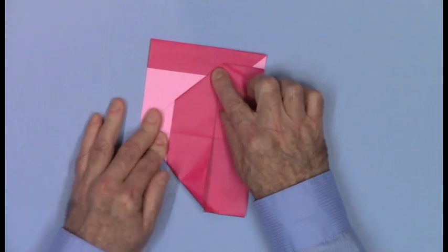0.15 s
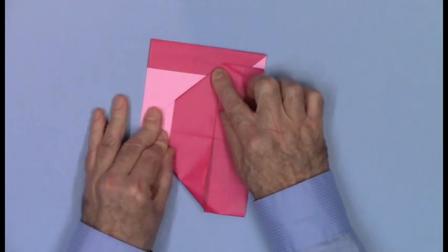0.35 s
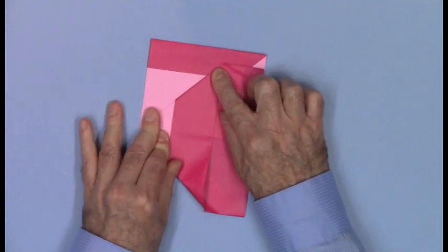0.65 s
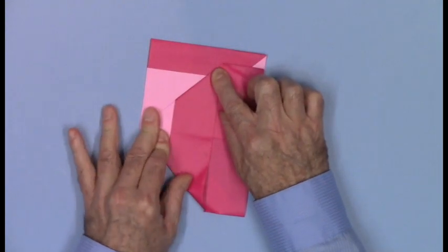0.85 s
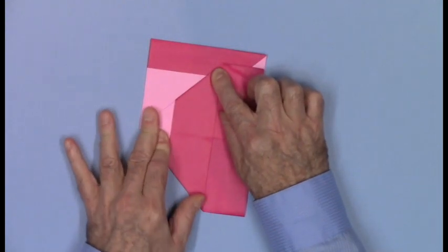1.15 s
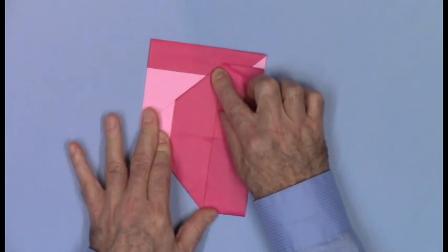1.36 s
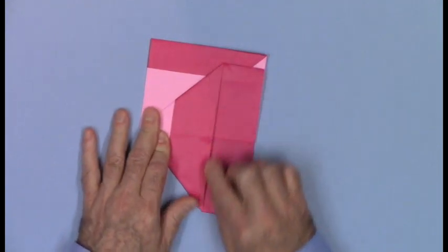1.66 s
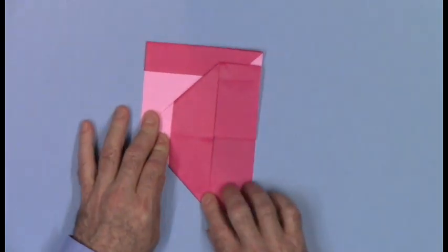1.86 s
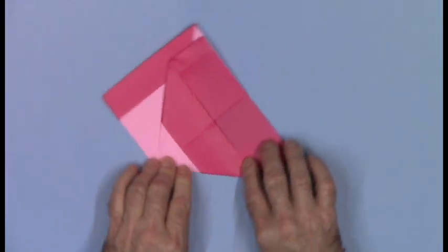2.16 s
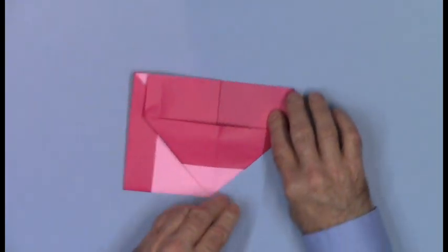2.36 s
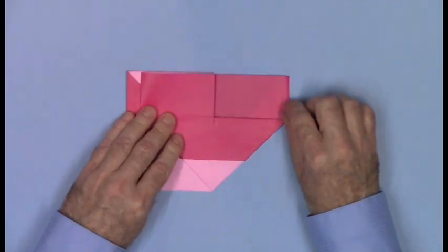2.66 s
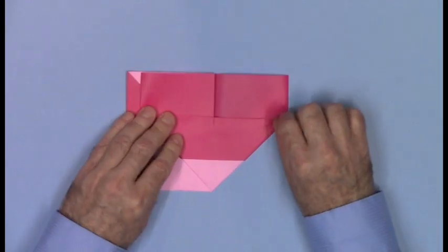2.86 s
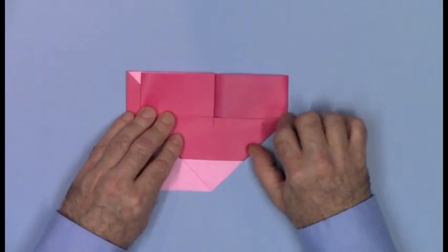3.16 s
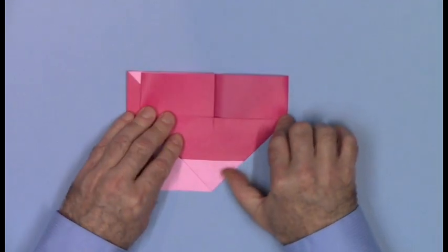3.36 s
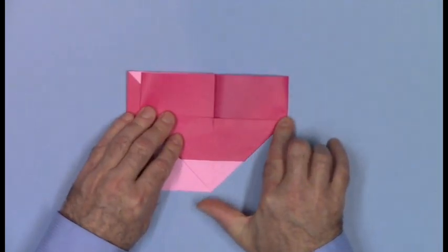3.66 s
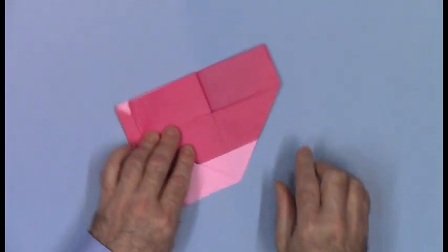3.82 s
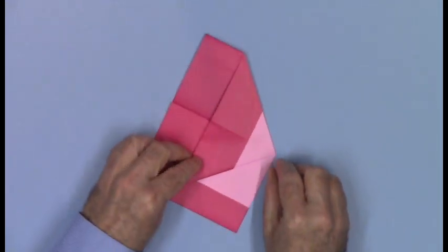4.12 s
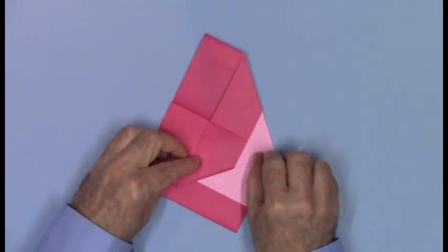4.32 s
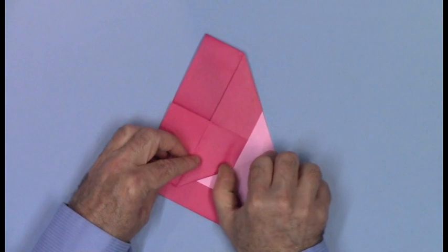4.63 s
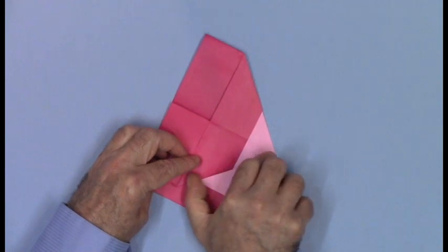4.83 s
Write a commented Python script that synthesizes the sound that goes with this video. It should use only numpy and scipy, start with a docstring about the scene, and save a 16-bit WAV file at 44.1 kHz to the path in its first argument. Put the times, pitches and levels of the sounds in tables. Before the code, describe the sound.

A sheet of paper is flattened, rotated twice and folded again by hand. Sparse soft rustles grow into a strong hissing slide, followed by a brief flap drag, sharp little crackles, thin finger rubbing, another slide and gentle creasing. Soft pats of hands on the table are dull and low. One close microphone, slight room reflection, steady faint ventilation hum, heard nearly all from the left.

```python
"""Folding paper on a table

Two hands flatten a folded sheet, slide it round twice and start the next fold. Slipping fibres hiss, ring and rasp;
fingertips chatter and swish as gliding noise bands; a flap and stiff creases shake resonances; landings stir the table.
A low rumble and faint hum fill the small room. The microphone feeds almost only the left channel."""
import sys
import numpy as np
from scipy import signal
from scipy.fft import rfft, irfft, next_fast_len
from scipy.io import wavfile

SR = 44100
rng = np.random.default_rng(int(sys.argv[2]) if len(sys.argv) > 2 else 0)


def output_pcm(signal):
    """Save a mono or channel-first signal as 16-bit PCM at the path in sys.argv[1].

    Samples are clipped to [-1, 1] before scaling.
    """
    pcm = np.clip(np.atleast_2d(signal).T, -1, 1) * 32767
    wavfile.write(sys.argv[1], SR, np.round(pcm).astype(np.int16))


N = 219970
TIME = np.arange(N) / SR  # s


def from_db(db):
    """Decibels to amplitude gain."""
    return 10 ** (np.asarray(db) / 20)


def rms_one(x):
    """Scale to unit rms."""
    return x / np.sqrt(np.mean(x ** 2) + 1e-20)


def unit_energy(x):
    """Scale to a sum of squares of 1."""
    return x / np.linalg.norm(x)


def colour(x, spectrum):
    """Filter to a spectrum interpolated in dB over log frequency; rms 1."""
    hz, db = np.transpose(spectrum)
    size = next_fast_len(len(x))
    bins_hz = np.maximum(np.fft.rfftfreq(size, 1 / SR), 1)
    gain = from_db(np.interp(np.log(bins_hz), np.log(hz), db))
    return rms_one(irfft(rfft(x, size) * gain, size)[:len(x)])


def noise(spectrum):
    """Coloured Gaussian noise of rms 1."""
    return colour(rng.standard_normal(N), spectrum)


def drift(changes_per_s):
    """Random curve of rms 1: straight lines between random knots."""
    knots = rng.standard_normal(int(N / SR * changes_per_s) + 3)
    return rms_one(np.interp(TIME * changes_per_s, np.arange(len(knots)), knots))


def gliding_band(centre_hz, width_hz):
    """Low-passed noise pair shifted up to a moving centre; rms 1."""
    phase = 2 * np.pi * np.cumsum(centre_hz) / SR
    low_pass = signal.butter(2, width_hz / 2, fs=SR, output="sos")
    swing = signal.sosfilt(low_pass, rng.standard_normal((2, N)))
    return rms_one(swing[0] * np.cos(phase) + swing[1] * np.sin(phase))


def resonate(x, modes):
    """Parallel two-pole resonances with alternating signs."""
    out = 0
    for k, (hz, width_hz, db) in enumerate(modes):
        r = np.exp(-np.pi * width_hz / SR)
        poles = [1, -2 * r * np.cos(2 * np.pi * hz / SR), r * r]
        rung = (1 - r * r) / 2 * signal.lfilter([1, 0, -1], poles, x + 1e-18)
        out = out + (-1) ** k * from_db(db) * rung
    return out


def slips(per_s, spread_db):
    """Random releases of caught fibres, uneven in size and sign; rms 1."""
    sizes = from_db(spread_db * np.minimum(rng.exponential(1, N), 4))
    released = rng.random(N) < per_s / SR
    return rms_one(released * sizes * rng.choice([-1, 1], N))


def fade(t, t60_s):
    """Exponential decay from t = 0, down 60 dB after t60_s."""
    return (t >= 0) * np.exp(-np.log(1000) * np.maximum(t, 0) / t60_s)


def stroke(middle_s, length_s):
    """Relative speed of a hand movement, 0-1: it gathers, holds and dies away."""
    speed_up_power, slow_down_power = 4.14, 4.2
    along = (TIME - middle_s) / (length_s / 2)
    return 1 / (1 + np.abs(along) ** np.where(along < 0, speed_up_power, slow_down_power))


def loudness(speeds, levels_db):
    """Friction amplitude follows speed; overlapping strokes add in power."""
    return np.sqrt(from_db(levels_db) ** 2 @ speeds ** 2)


def background():
    """Ventilation rumbles and hums under a thin hiss; the hum wavers and later shifts its colour."""
    # Room hum. Each row: frequency in Hz, level in dB, change of level at the colour shift in dB.
    hum_tones = [(53.76, -48, 2), (73.85, -49, -4), (91.34, -48, -3), (182.16, -58.5, 0.5),
                 (218.05, -67.5, -3), (274, -75.5, 12)]
    # Room rumble. Each row: frequency in Hz, relative density in dB per Hz.
    rumble_spectrum = [(12, -4), (28, 2), (40, 1), (58, -3), (80, -12.5), (105, -11.5), (150, -19.5),
                       (220, -23.5), (300, -26.5), (600, -36), (1500, -80)]
    # Thin room hiss. Each row: frequency in Hz, relative density in dB per Hz.
    air_spectrum = [(200, -6), (600, 3.5), (1500, -0.5), (3500, 1.5), (7000, -7.5), (12000, -12),
                    (15500, -28)]
    rumble_db, air_db, shift_s = -43.5, -64, 3.98
    shifted = .5 + .5 * np.tanh((TIME - shift_s) / 0.28)
    hum = 0
    for hz, db, change_db in hum_tones:
        phase = 2 * np.pi * (hz * TIME + rng.random()) + 0.39 * drift(4.73)
        level_db = db + change_db * shifted + 0.41 * drift(5.7)
        hum = hum + np.sqrt(2) * from_db(level_db) * np.sin(phase)
    return hum + from_db(rumble_db) * noise(rumble_spectrum) + from_db(air_db) * noise(air_spectrum)


def pats():
    """Fingers and paper land softly, exciting only low resonances of the table."""
    # Landings. Each row: start in seconds, level in dB, 60 dB decay time in seconds.
    landings = [(1.314, -51.5, 0.25), (1.344, -65, 0.154), (1.564, -55, 0.059), (1.822, -61, 0.071),
                (2.686, -46, 0.055), (3.603, -43, 0.08), (3.616, -52, 0.22), (4.201, -56, 0.102),
                (4.629, -58, .06)]
    # Table top resonances. Each row: frequency in Hz, width in Hz, relative level in dB.
    table_modes = [(322.3, 144, 2.5), (443, 160, 3), (780, 350, -7.5), (1120, 130, -6)]
    force = sum(from_db(db) * fade(TIME - s, t60_s) for s, db, t60_s in landings)
    white = rng.standard_normal(N)
    return resonate(force * white, table_modes) / np.std(resonate(white, table_modes))


def dragging_flap(smooth_db=4.5):
    """A flap edge sticks and slips over smoother friction, shaking the flap's resonances."""
    # Drag curve. Each row: time in seconds, level in dB, slips per second.
    drag_curve = [(2.520, -83, 700), (2.525, -43, 860), (2.548, -41.5, 3000), (2.585, -46, 1900),
                  (2.61, -45, 590), (2.635, -50.5, 580), (2.67, -58, 460), (2.72, -80, 930)]
    # Flap resonances. Each row: frequency in Hz, width in Hz, relative level in dB.
    flap_modes = [(1270, 298, -14.5), (1737, 74.6, 0.5), (2137, 190, 1), (2780, 230, -1), (3310, 450, -6),
                  (4950, 1460, -19.5)]
    knots_s, knots_db, knots_per_s = np.transpose(drag_curve)
    level_db = np.interp(TIME, knots_s, knots_db)
    per_s = np.interp(TIME, knots_s, knots_per_s)
    catches = slips(per_s, spread_db=0)
    friction = catches + from_db(smooth_db) * rng.standard_normal(N)
    return from_db(level_db) * rms_one(resonate(friction, flap_modes))


def fingertip(chatter_width_hz=520, swish_width_hz=2000):
    """Skin chatters narrowly on the fold and swishes over the sheet; pitches glide from rub to rub."""
    # Rubs along a fold. Each row: middle in seconds, length in seconds, swish level in dB,
    # swish centre in Hz, chatter level in dB, chatter pitch in Hz.
    rubs = [(0.01, 0.082, -57, 5880, -77, 3265), (0.84, .07, -59.5, 7700, -63, 3200),
            (0.915, 0.071, -58, 5100, -77, 3220), (2.728, 0.042, -52.5, 6000, -73, 3200),
            (3.046, .09, -63, 5600, -61, 3490), (3.15, 0.085, -60.5, 9300, -56, 3220),
            (3.3, 0.07, -58, 8000, -52.5, 3113), (3.395, 0.051, -53.5, 6300, -60, 3300),
            (3.495, 0.056, -68, 6400, -57, 3110), (3.542, .04, -55, 7300, -66, 3100),
            (4.535, 0.029, -66, 5500, -59, 3380), (4.603, .03, -60, 5200, -55, 3250),
            (4.725, 0.0445, -55.5, 5200, -55.5, 3130), (4.795, .06, -54.5, 6450, -68, 3130)]
    middle_s, length_s, swish_db, swish_hz, chatter_db, chatter_hz = np.transpose(rubs)
    speeds = np.array([stroke(*when) for when in zip(middle_s, length_s)])
    chatter = gliding_band(np.interp(TIME, middle_s, chatter_hz), chatter_width_hz)
    swish = gliding_band(np.interp(TIME, middle_s, swish_hz), swish_width_hz)
    return loudness(speeds, chatter_db) * chatter + loudness(speeds, swish_db) * swish


def snaps(body_db=-6.0, crack_t60_s=0.0087, shiver_t60_s=0.018, soft_hz=5500, size=4096):
    """A crease buckles: a jolt and a dying shiver ring facet and sheet, under a short bright crack."""
    # Snaps. Each row: start in seconds, level in dB, pitch in Hz, ring width in Hz,
    # crack level relative to the ring in dB, shiver level relative to the jolt in dB.
    buckles = [(0.34, -47, 2470, 400, -22, -2), (0.4889, -48, 1920, 900, -24, -4),
               (1.06, -39.5, 1530, 400, 2, -3), (1.196, -46, 1840, 700, -6.5, -2),
               (1.2318, -45.5, 1150, 900, -22, -5), (1.3883, -45.5, 1830, 600, -16, 1.5),
               (1.553, -37, 3930, 900, -7.5, -3), (1.564, -37.5, 1370, 600, -12, -6),
               (1.818, -40.5, 1270, 1300, -28, 2), (2.126, -38.5, 1320, 700, -16, 5),
               (2.402, -33, 2500, 800, -24, -13), (2.674, -33.5, 2170, 500, -13.5, 5),
               (2.6786, -37, 2940, 1200, -18, -3), (3.4416, -30.5, 3340, 900, -11.5, 0.5),
               (3.6016, -32.5, 3878, 2210, -11, -3), (3.6043, -36.5, 1205, 600, -25, 4),
               (4.135, -44.5, 4000, 1500, -17, -6), (4.2255, -46, 2500, 3000, -24, 12),
               (4.334, -47, 8010, 900, -18, 3), (4.533, -49.5, 3330, 600, -12, 3),
               (4.6286, -30, 2520, 1096, -31, 1), (4.875, -43.5, 1882, 1800, -21.5, 15)]
    # Resonances of the paper lying on the table. Each row: frequency in Hz, width in Hz, relative level in dB.
    crease_modes = [(494, 240, -7.5), (927, 140, -3), (1880, 520, -33), (2846, 92, 2), (3200, 950, -5),
                    (4750, 2100, -35)]
    # Crack spectrum. Each row: frequency in Hz, relative density in dB per Hz.
    crack_spectrum = [(2000, -29), (4500, 17), (6500, 13.5), (8000, 22), (10500, 9), (13000, -5.5),
                      (15500, -32)]
    out, t = np.zeros(N + size), np.arange(size) / SR
    soften = signal.butter(2, soft_hz, fs=SR, output="sos")
    # level_db: energy spread over 2 ms
    spread = np.sqrt(.002 * SR)
    for s, level_db, pitch_hz, width_hz, sharp_db, shiver_db in buckles:
        grain = rng.standard_normal((2, size))
        # the shiver starts one pitch period after the jolt
        force = np.array([t == 0, grain[0] * fade(t - 1 / pitch_hz, shiver_t60_s)])
        facet = resonate(force, [(pitch_hz, width_hz, 0)])
        rung = facet + from_db(body_db) * resonate(force, crease_modes)
        jolt, shiver = map(unit_energy, signal.sosfilt(soften, rung))
        ring = unit_energy(jolt + from_db(shiver_db) * shiver)
        crack = unit_energy(colour(grain[1], crack_spectrum) * fade(t, crack_t60_s))
        at = round(s * SR)
        out[at:at + size] += from_db(level_db) * spread * (ring + from_db(sharp_db) * crack)
    return out[:N]


def rubbing(brighten_db=1.0):
    """Dense fibre slips hiss, ring and rasp; each stroke brightens as the hand lightens towards its end."""
    # Sliding and smoothing. Each row: middle in seconds, length in seconds, fibre hiss in dB (before
    # the top shift), sheet ring in dB, pressed-paper rasp in dB, shift of the hiss above 8 kHz in dB.
    strokes = [(0.063, 0.18, -62, -60.5, -66.5, -8), (0.273, 0.17, -64, -53.5, -65, -6),
               (0.622, .05, -57.5, -63, -72, -8), (0.707, .07, -55, -59, -69, -7),
               (0.893, 0.25, -56, -64.5, -65.5, -1), (0.93, 0.067, -52, -76, -64, 4),
               (1.072, .08, -59, -64, -59.5, 0), (1.235, .1, -64, -78, -65, -1),
               (1.342, 0.07, -53.5, -62, -57, -1.5), (1.576, 0.091, -53.5, -56, -59, -1),
               (1.691, 0.26, -51, -57, -58, 0), (1.836, .12, -58, -59, -58.5, -4),
               (1.979, 0.14, -44.5, -52.5, -62, -1.5), (2.278, 0.31, -39.5, -49, -54, -0.5),
               (2.596, 0.24, -54.5, -60, -59, -11), (2.728, 0.059, -51.5, -74, -59.5, -8),
               (3.148, 0.1, -55, -54.5, -65.5, -1), (3.365, 0.27, -57, -55.5, -63, 0.5),
               (3.535, 0.076, -54.5, -66, -64, -1), (3.633, 0.1, -53.5, -66, -58, 1),
               (3.784, 0.064, -50, -61, -55.5, -1), (3.928, 0.22, -40.5, -52, -57, -1.5),
               (4.154, 0.082, -53, -61, -60.5, -3), (4.222, 0.12, -56.5, -62, -56.5, -3.5),
               (4.39, 0.16, -57, -67, -61.5, -4), (4.535, 0.077, -52, -61.5, -59.5, -7),
               (4.605, .03, -50, -55, -63, -9), (4.718, 0.2, -51, -62.5, -67, -7),
               (4.804, 0.082, -51, -68, -70, -2), (4.93, 0.26, -58.5, -65.5, -64, 0.5)]
    # Fibre hiss spectrum. Each row: frequency in Hz, relative density in dB per Hz.
    hiss_spectrum = [(1000, -18), (2500, -14), (3300, -4), (5200, -0.5), (8000, -1), (10500, -3),
                     (13000, -6.5), (15500, -24)]
    # Rasp spectrum. Each row: frequency in Hz, relative density in dB per Hz.
    rasp_spectrum = [(250, -10.5), (450, -0.5), (720, -5.5), (950, 0), (1130, 0.5), (1300, 0.5),
                     (1550, 0.5), (2100, -2), (3000, -12), (6000, -25)]
    # Folded sheet resonances. Each row: frequency in Hz, width in Hz, relative level in dB.
    sheet_modes = [(2360, 890, -7.5), (3130, 350, -1), (3800, 930, -8.5)]
    # resting hands never keep quite still
    rest_hiss_db, rest_ring_db, rest_rasp_db, rest_swing_db, rest_changes_per_s = -68, -75, -70, 2, 12
    # contact pressure and brightness flutter
    flutter_db, flutter_per_s, top_flutter_db, top_flutter_per_s = 0.98, 90, 0.23, 32

    middle_s, length_s, hiss_db, ring_db, rasp_db, top_db = np.transpose(strokes)
    speeds = np.array([stroke(*when) for when in zip(middle_s, length_s)])
    progress = np.tanh((TIME[:, None] - middle_s) / (length_s / 2))
    bright_db = np.average(top_db + brighten_db * progress, axis=1, weights=speeds.T ** 2)
    fidget = from_db(rest_swing_db * drift(rest_changes_per_s))
    pressure = from_db(flutter_db * drift(flutter_per_s))

    fibres = colour(slips(per_s=15000, spread_db=1.0), hiss_spectrum)
    top = signal.sosfiltfilt(signal.butter(2, 8000, "high", fs=SR, output="sos"), fibres)
    top_gain = from_db(bright_db + top_flutter_db * drift(top_flutter_per_s))
    hiss = fibres - top + top * top_gain
    ring = rms_one(resonate(slips(per_s=7000, spread_db=3.0), sheet_modes))
    rasp = colour(slips(per_s=3500, spread_db=2.5), rasp_spectrum)

    layers = [(hiss, hiss_db, rest_hiss_db), (ring, ring_db, rest_ring_db), (rasp, rasp_db, rest_rasp_db)]
    out = 0
    for sound, moving_db, rest_db in layers:
        out = out + sound * np.hypot(loudness(speeds, moving_db), fidget * from_db(rest_db))
    return pressure * out


def under_hand(x, lag_s=0.0014, bounce_db=-14):
    """Sound bounces off the moving hand above the paper; the drifting lag shifts its colour."""
    drifting_lag_s = lag_s * from_db(2 * drift(7))
    bounce = from_db(bounce_db)
    return (x + bounce * np.interp(TIME - drifting_lag_s, TIME, x)) / np.hypot(1, bounce)


def room(x, echo_s=0.0083, echo_db=-15, wall_hz=6000, size=16384):
    """One near reflection, then a short, duller tail of decaying noise."""
    t60_s, tail_db = 0.51, -15
    t = np.arange(size) / SR
    tail = rng.standard_normal(size) * fade(t - echo_s, t60_s)
    tail = signal.sosfilt(signal.butter(1, wall_hz, fs=SR, output="sos"), tail)
    response = from_db(tail_db) * unit_energy(tail)
    response[round(echo_s * SR)] += from_db(echo_db)
    return x + signal.fftconvolve(x, response)[:N]


def scene():
    """One microphone on the left, a faint inverted leak on the right; separate circuit noise in each."""
    # Circuit noise spectrum. Each row: frequency in Hz, relative density in dB per Hz.
    circuit_spectrum = [(10, 27), (30, 35.5), (55, 26), (85, 10), (130, 14.5), (300, 7), (700, 5.5),
                        (2000, 4), (8000, 1.5), (12500, -0.5), (15500, -14)]
    right_leak_db, circuit_db = -42, -51.5
    paper = under_hand(rubbing()) + fingertip() + dragging_flap() + snaps() + pats()
    # source levels are ahead of this doubling
    microphone = 2 * (room(paper) + background())
    circuit = from_db(circuit_db) * np.array([noise(circuit_spectrum), noise(circuit_spectrum)])
    return np.array([microphone, -from_db(right_leak_db) * microphone]) + circuit


def record(dry):
    """A steep elliptic low-pass cuts the top."""
    cutoff_hz = 15800
    return signal.sosfilt(signal.ellip(10, .1, 80, cutoff_hz, fs=SR, output="sos"), dry)


dry = scene()
out = record(dry)
output_pcm(out)
```